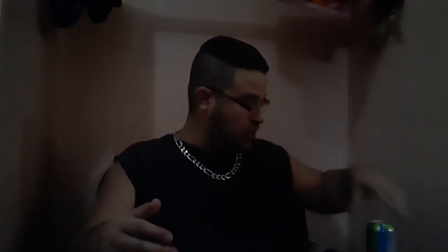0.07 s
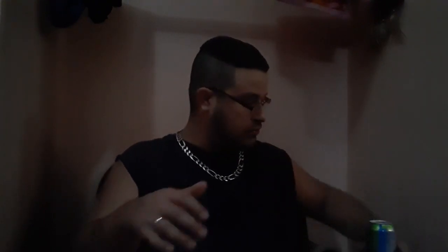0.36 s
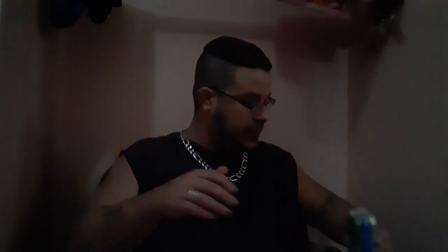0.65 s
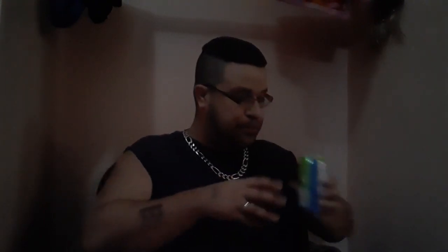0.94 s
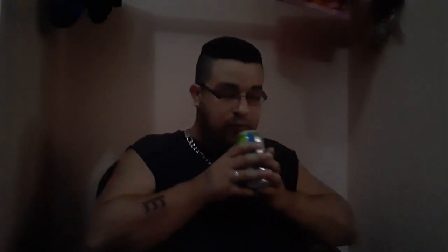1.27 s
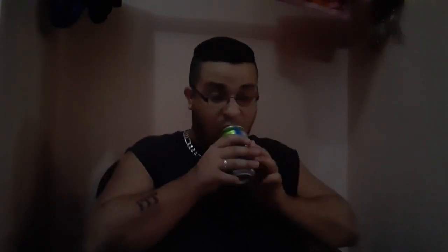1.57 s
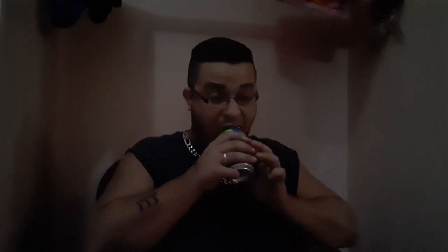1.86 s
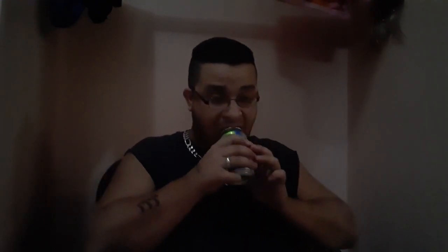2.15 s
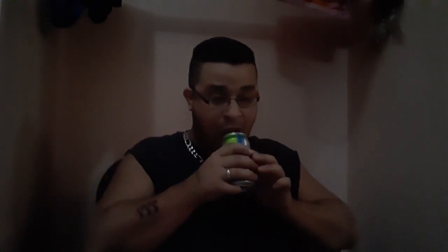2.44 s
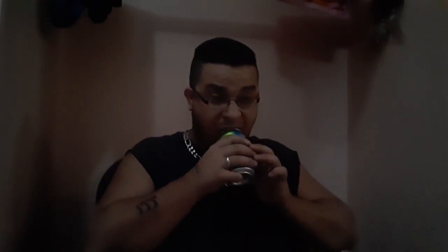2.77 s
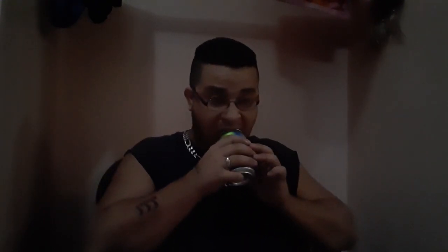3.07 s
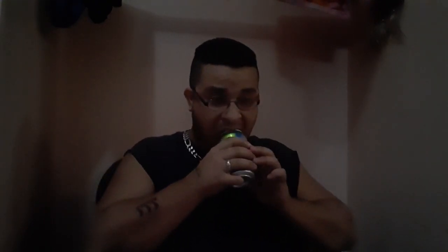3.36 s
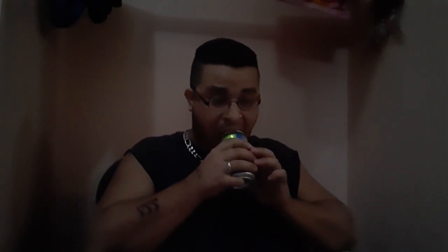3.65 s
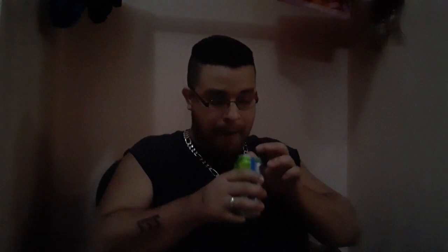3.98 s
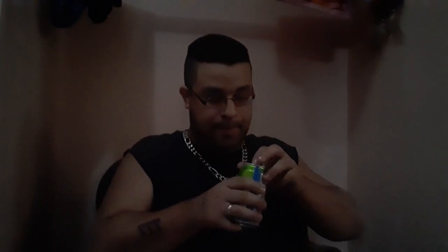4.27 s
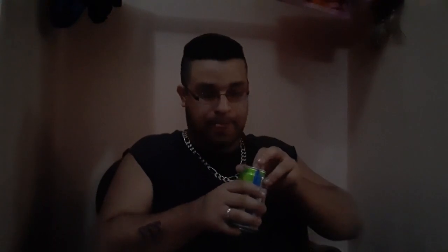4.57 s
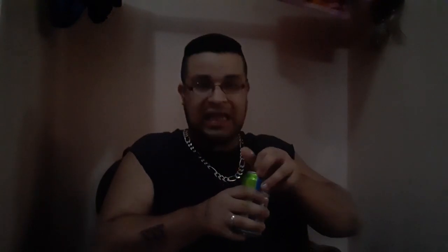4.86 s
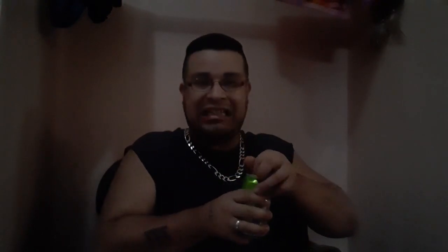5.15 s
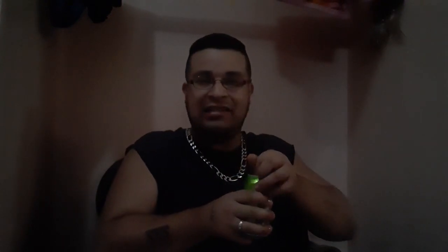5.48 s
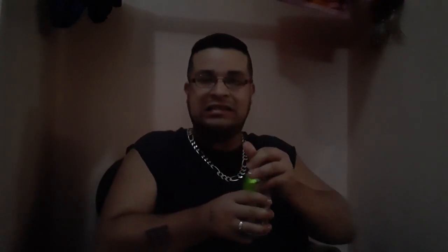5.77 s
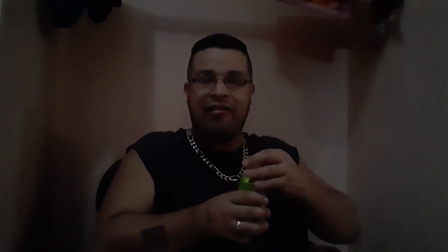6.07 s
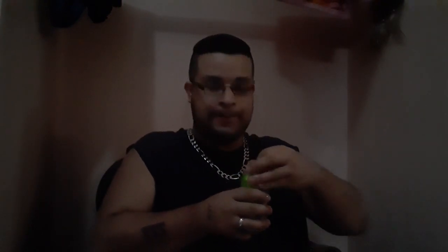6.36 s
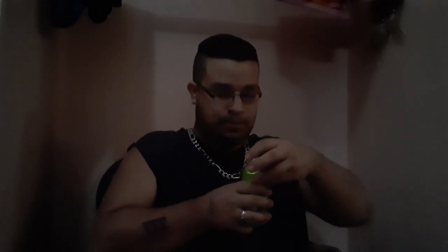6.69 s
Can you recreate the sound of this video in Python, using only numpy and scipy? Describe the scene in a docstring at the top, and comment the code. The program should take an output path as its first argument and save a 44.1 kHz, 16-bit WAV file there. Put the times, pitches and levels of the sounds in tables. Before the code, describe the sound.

A metallic twang from a can tab, followed by the fizzy drink can being opened with sharp cracks and brief spurts of gas.

```python
"""A can of fizzy drink is opened in a small bare room. Teeth pick at the tab, which slips and twangs;
then a finger levers it: the seal cracks, gas spurts out, and the lid tears along its score in two pushes.
Around this come a clack, light knocks, a seat's groan, a squeak of the tab and the rustle of hands.
A fan hums faintly over the room air, and an automatic gain control ducks after each loud snap."""
import sys
import numpy as np
from scipy import signal
from scipy.fft import rfft, irfft
from scipy.io import wavfile
from scipy.ndimage import uniform_filter1d, minimum_filter1d

SR = 44100
rng = np.random.default_rng(int(sys.argv[2]) if len(sys.argv) > 2 else 0)


def to_wav(s):
    """Save 16-bit WAV."""
    ch = np.atleast_2d(s).T  # columns
    pcm = np.round(np.clip(ch, -1, 1) * 32767)  # PCM
    wavfile.write(sys.argv[1], SR, pcm.astype(np.int16))


N = 305256
TIME_S = np.arange(N) / SR

# Room air and hiss. Each row: frequency in Hz, density in dB. All table levels are relative.
AIR_SPECTRUM = [(25, -25), (45, -11.5), (70, -3.5), (200, -1.5), (300, -4.5), (550, -9), (1050, -10),
                (1700, -21), (3500, -28), (5000, -28.5), (7500, -39), (9000, -47.5), (11000, -29),
                (15500, -28)]
# Stereo likeness of the air. Each row: frequency in Hz, left-right correlation before capping.
AIR_CORRELATION = [(60, 0.93), (180, .8), (550, 0.93), (1500, 0.22), (15000, 0.0067)]
# Stereo balance of the air. Each row: frequency in Hz, left minus right in dB.
AIR_PAN = [(60, 10.5), (240, 4.0), (950, 1), (3770, 2.5), (15000, -0.5)]
# Fan hum. Each row: frequency in Hz, level in dB.
FAN_LINES = [(61, -69), (119.5, -62), (214, -63), (293, -72.5), (481, -64.5), (770, -63)]
# Room reverberation. Each row: frequency in Hz, T60 in seconds.
ROOM_DECAY = [(150, 0.068), (1000, 0.38), (3500, 0.37), (7000, 0.38), (11000, 0.33), (16000, 0.2)]
# Hands shifting grip. Each row: middle in seconds, length in seconds, level in dB.
GRIP_SWELLS = [(.44, 0.39, -66), (4.844, 0.17, -67.5), (6.41, 0.21, -68.5), (6.76, 0.24, -67.5)]
# Sliding skin and cloth. Each row: frequency in Hz, density in dB.
RUSTLE_SPECTRUM = [(300, -9), (1400, 1.5), (3800, -3), (7000, -7), (15000, -17.5)]
# The seat groans; later the tab squeaks in the teeth. Each row: start in seconds, length in seconds,
# level in dB, pitch in Hz, glide in Hz per second, waver as a share of pitch.
FRICTION_TONES = [(0.377, 0.091, -47.5, 239, 444, 0.055), (3.562, 0.051, -42, 953.6, 30, 0.0064)]
# Opening clack. Each row: frequency in Hz, density in dB.
CLACK_SPECTRUM = [(300, -35), (1400, -13), (2400, -6), (4600, 3.5), (6500, -4), (9500, -10.5), (12000, -4),
                  (15500, -15)]
# Teeth and fingers on the can. Each row: start in seconds, level in dB, centre in Hz, width in octaves.
KNOCKS = [(0.645, -53.5, 1610, 0.17), (0.8392, -53.5, 9250, 1.1), (1.2973, -54.5, 6760, 1.4),
          (1.3352, -50, 12900, .3), (1.698, -48, 1830, 1.9), (2.336, -34.5, 1670, 2.1),
          (2.8281, -49, 2270, .7), (3.559, -43.5, 1890, 0.28), (4.4204, -52.5, 2140, 0.6),
          (6.133, -55.5, 8100, 2.1), (6.2685, -55, 1270, .25), (6.7127, -56.5, 3900, 1.3)]
# Tab slipping off the teeth.
# Each row: start in seconds, level in dB, tilt in dB per octave, ring over crack in dB.
TAB_SNAPS = [(1.6975, -39.5, 3.5, -19), (1.9245, -44, -3.5, -14), (2.1237, -10, -0.5, 2),
             (2.537, -43.5, 0, -14.5), (2.7503, -47.5, 0.5, -22), (3.5577, -32, -3.5, -1.5)]
# Tab modes. Each row: frequency in Hz, level in dB, T60 in seconds.
TAB_RING = [(1090, -20, 0.02), (1580, -30.5, .05), (3224, -10, 0.022), (3370, 0, 0.054), (3513, -12, 0.056),
            (5454, -2.5, 0.019), (5638, -4, 0.046), (5930, -10, 0.032), (6280, -9.5, 0.023),
            (7530, -7, 0.034), (8860, -7, 0.0083), (12100, -13.5, 0.011)]
# Tab edge letting go. Each row: frequency in Hz, density in dB.
TAB_SPECTRUM = [(30, -25.5), (130, -13), (450, -24), (850, -12), (1900, -23), (2700, -4), (4400, 0.5),
                (6300, -1.5), (9700, -6.5), (12000, -0.5), (15500, -15)]
# Narrow, bright gas jet. Each row: frequency in Hz, density in dB.
SPURT_SPECTRUM = [(30, -19.5), (200, -3), (800, -11.5), (1200, -12), (2000, -4.5), (4500, 0), (7500, -3),
                  (9500, -1), (11700, 4), (15500, -1.5)]
# Low body of that jet. Each row: frequency in Hz, density in dB.
BODY_SPECTRUM = [(60, -19), (220, 0), (1000, -3), (1500, -24.5), (6000, -50)]
# Last gas as the mouth widens. Each row: start in seconds, length in seconds, level in dB.
GUSH_BURSTS = [(5.407, .012, -31), (5.444, 0.028, -14.5)]
# Wide, duller gas jet. Each row: frequency in Hz, density in dB.
GUSH_SPECTRUM = [(200, -30.5), (500, -27), (750, 1), (1400, 0.5), (2200, -1.5), (3100, 8.5), (5800, -2.5),
                 (7500, 1), (9500, -11), (11200, 1), (15000, -6.5)]
# Score tearing: push, creep, push. Each row: start in seconds, length in seconds, level in dB.
TEAR_BURSTS = [(5.076, 0.063, -20.5), (5.16, 0.053, -41.5), (5.46, 0.033, -24.5)]
# Lid buckling. Each row: start in seconds, level in dB, tilt in dB per octave, ring over crack in dB.
LID_SNAPS = [(5.0205, -13.5, 3.5, -5.5), (5.0667, -4.5, -2, 6.5), (5.0785, -3, 1.5, 15),
             (5.2943, -17.5, 1.5, -4.5), (5.3124, -18, 3.5, 0), (5.318, -21, -1.5, 7.5),
             (5.4155, -21, 0.5, 0), (5.423, -9.5, 4, 4), (5.456, -5, 0.5, 4.5)]
# Lid modes, damped by drink and hand. Each row: frequency in Hz, level in dB, T60 in seconds.
LID_RING = [(1800, -8.5, 0.0072), (2114, -8, 0.016), (3804, -10, 0.015), (4450, -4, 0.0067),
            (4826, -5, 0.016), (5650, -6, .009), (6560, -9, .007), (8500, -16.5, .008), (11000, -18, .005)]
# Lid giving way. Each row: frequency in Hz, density in dB.
LID_SPECTRUM = [(30, -30.5), (130, -18.5), (400, -28.5), (900, -15.5), (1400, -6.5), (2500, -1.5),
                (4200, -3.5), (6500, 4.5), (9500, -5.5), (12000, -0.5), (15500, -13.5)]


def from_db(db):
    """Decibels to gain."""
    return 10 ** (np.asarray(db) / 20)


def unit_rms(x):
    """Scale to rms 1."""
    return x / np.sqrt(np.mean(x ** 2) + 1e-20)


def unit_attack(x):
    """Scale the first 3 ms to rms 1."""
    return x / np.sqrt(np.mean(x[:132] ** 2) + 1e-20)


def at_hz(points, hz):
    """Interpolate a table over log frequency."""
    known_hz, values = np.transpose(points)
    return np.interp(np.log(hz + 1e-9), np.log(known_hz), values)


def bins_hz(size):
    """FFT bin frequencies."""
    return np.fft.rfftfreq(size, 1 / SR)


def noise(gain):
    """Noise of rms 1, shaped by a gain per bin."""
    return unit_rms(irfft(gain * np.exp(2j * np.pi * rng.random(len(gain)))))


def drift(rate_hz):
    """Low-passed random wander of rms 1."""
    return noise(1 / (1 + (bins_hz(N) / rate_hz) ** 2))


def rushing(spectrum, sputter_db):
    """Turbulent or sliding noise that sputters in level."""
    return noise(from_db(at_hz(spectrum, bins_hz(N)))) * from_db(sputter_db * drift(300))


def pan(db):
    """Channel gains for a left-minus-right level."""
    return from_db(np.array([[.5], [-.5]]) * db)


def add(track, start_s, sound):
    """Mix a sound in place."""
    start = min(round(start_s * SR), N)
    track[start:start + len(sound)] += sound[:N - start]


def decay(t60_s, size=4096):
    """Exponential decay."""
    return from_db(-60 * TIME_S[:size] / t60_s)


def burst(start_s, length_s, db, attack_s, release_db_per_s):
    """Rise, hold and release envelope."""
    age_s = TIME_S - start_s
    fall_db = np.clip(release_db_per_s * (age_s - length_s), 0, 200)
    return np.clip(age_s / attack_s, 0, 1) * from_db(db - fall_db)


def room_air():
    """Steady noise, alike in both channels in the bass."""
    hz = bins_hz(N)
    alike = np.clip(at_hz(AIR_CORRELATION, hz), 0, .85)
    mid, side = rfft(rng.standard_normal((2, N)))
    stereo = np.sqrt(1 + alike) * mid + np.sqrt(1 - alike) * side * [[1], [-1]]
    return unit_rms(irfft(from_db(at_hz(AIR_SPECTRUM, hz)) * pan(at_hz(AIR_PAN, hz)) * stereo))


def fan(waver_hz=1.45):
    """Hum lines, each wavering in pitch."""
    return sum(from_db(db) * np.sqrt(2) * np.sin(2 * np.pi * np.cumsum(hz + waver_hz * drift(5)) / SR)
               for hz, db in FAN_LINES)


def background(lag_samples=14):
    """Air and fan; both reach the left channel later."""
    left, right = from_db(-54.56) * room_air() + from_db(-2.5) * pan(3) * fan()
    return np.array([np.interp(TIME_S - lag_samples / SR, TIME_S, left), right])


def room(x, wet_db=4.5, build_s=.0041, reflection_s=.0011, reflection_db=-5, size=32768):
    """Direct sound, one near reflection and a dense tail that differs per channel."""
    hz = bins_hz(size)
    white = np.exp(2j * np.pi * rng.random((2, len(hz))))
    tail = 0
    for band_hz, t60_s in ROOM_DECAY:
        band = at_hz([(row[0], row[0] == band_hz) for row in ROOM_DECAY], hz)
        tail += irfft(white * band) * decay(t60_s, size)
    tail *= 1 - np.exp(-(TIME_S[:size] / build_s) ** 2)
    response = from_db(wet_db) * pan(1.5) * tail / np.linalg.norm(tail, axis=1, keepdims=True)
    response[:, :1] += pan(6.5)   # direct path
    for channel in response:
        channel[round(reflection_s * SR * rng.uniform(.8, 1.2))] += from_db(reflection_db)
    return signal.fftconvolve(x[None], response, axes=1)[:, :N]


def grip_rustle():
    """Skin and cloth slide in bell-shaped swells."""
    swells = sum(from_db(db) * np.exp(-np.minimum(2 * ((TIME_S - middle_s) / length_s) ** 2, 20))
                 for middle_s, length_s, db in GRIP_SWELLS)
    return swells * rushing(RUSTLE_SPECTRUM, sputter_db=1.5)


def friction_tone(start_s, length_s, db, start_hz, glide_hz_per_s, waver):
    """Stick and slip drives one resonance, gliding and unsteady in pitch."""
    glide_hz = start_hz + glide_hz_per_s * np.clip(TIME_S - start_s, 0, length_s)
    hz = glide_hz * (1 + waver * drift(70))
    tone = unit_rms(np.sin(2 * np.pi * np.cumsum(hz) / SR))
    return tone * burst(start_s, length_s, db, attack_s=.005, release_db_per_s=1300)


def clack(peak_s=.0562, growth_db_per_s=900, t60_s=.017):
    """A brief noise swell rises into a sharp clack, then stops dead."""
    age_s = TIME_S - peak_s
    db = np.where(age_s < 0, -41 + growth_db_per_s * age_s, -22.5 - 60 * age_s / t60_s)
    return from_db(np.maximum(db, -200)) * noise(from_db(at_hz(CLACK_SPECTRUM, bins_hz(N))))


def faint_touches(count=24, per_s=2.2, low_hz=1400, high_hz=9000):
    """Random finger contacts, as rows like KNOCKS."""
    wait, strength, pitch = rng.random((count, 3)).T
    starts_s = np.cumsum(2 * wait / per_s)
    centres_hz = low_hz * (high_hz / low_hz) ** pitch
    return list(zip(starts_s, -64 + 3 * strength, centres_hz, np.ones(count)))


def handling(t60_s=.012):
    """Light contacts on the can: band-limited bursts, damped at once by the hand."""
    out = np.zeros(N)
    for start_s, db, centre_hz, octaves in KNOCKS + faint_touches():
        band = 1 / (1 + (np.log2((bins_hz(4096) + 1) / centre_hz) / octaves) ** 2) ** 2
        add(out, start_s, from_db(db) * unit_attack(noise(band) * decay(t60_s)))
    return out


def metal_ring(modes, tilt_db_per_oct, scatter_db, detune):
    """One blow on a set of modes; the metal bends, so levels and pitches vary each time."""
    out = 0
    for k, (hz, db, t60_s) in enumerate(modes):
        gain = from_db(db + tilt_db_per_oct * np.log2(hz) - scatter_db * rng.normal())
        bent_hz = hz * (1 + detune * rng.normal())
        out += (-1) ** k * gain * np.sin(2 * np.pi * bent_hz * TIME_S[:4096]) * decay(t60_s)
    return unit_attack(out)


def snaps(events, modes, spectrum, crack_t60_s, scatter_db, detune):
    """Thin metal jumps: a brief broad crack plus the ring of the part that moved."""
    out, hz = np.zeros(N), bins_hz(4096)
    for start_s, db, tilt_db_per_oct, ring_db in events:
        colour = from_db(at_hz(spectrum, hz) + tilt_db_per_oct * np.log2(hz + 100))
        crack = unit_attack(noise(colour) * decay(crack_t60_s))
        ring = from_db(ring_db) * metal_ring(modes, tilt_db_per_oct, scatter_db, detune)
        add(out, start_s, from_db(db) * unit_attack(crack + ring))
    return out


def tab_twangs(bounce_count=4, first_gap_s=.0208, gap_ratio=.75):
    """The tab slips and springs back; after the hardest slip it bounces on the lid ever faster."""
    hardest_s = max(TAB_SNAPS, key=lambda row: row[1])[0]
    bounces_s = hardest_s + np.cumsum(first_gap_s * gap_ratio ** np.arange(bounce_count))
    events = TAB_SNAPS + [(start_s, -15, 1, 4) for start_s in bounces_s]
    return snaps(events, TAB_RING, TAB_SPECTRUM, crack_t60_s=.037, scatter_db=5.5, detune=.0068)


def escaping_gas(start_s=5.022, length_s=.035, widening_s=.016):
    """A bright spurt fills out as the slit widens; duller gushes follow through the open mouth."""
    spurt = burst(start_s, length_s, db=-16, attack_s=.0095, release_db_per_s=900)
    body = burst(start_s, length_s, db=-33, attack_s=widening_s, release_db_per_s=900)
    gush = sum(burst(*row, attack_s=.0055, release_db_per_s=428) for row in GUSH_BURSTS)
    return (spurt * rushing(SPURT_SPECTRUM, sputter_db=2)
            + body * rushing(BODY_SPECTRUM, sputter_db=.8)
            + gush * rushing(GUSH_SPECTRUM, sputter_db=.5))


def score_tearing(slips_per_s=700, spread_db=8.5, places=12):
    """The score yields in a run of tiny slips; each place along it rings the lid differently."""
    slipping = rng.random(N) < slips_per_s / SR
    slips = slipping * from_db(spread_db * rng.uniform(-.89, 1, N)) * rng.choice([-1, 1], N)
    place = rng.integers(0, places, N)
    rings = 0
    for k in range(places):
        ring = metal_ring(LID_RING, tilt_db_per_oct=4, scatter_db=1, detune=.04)
        rings += signal.oaconvolve(slips * (place == k), ring)[:N]
    return unit_rms(rings) * sum(burst(*row, attack_s=.012, release_db_per_s=753) for row in TEAR_BURSTS)


def lid_cracks():
    """The levered lid buckles, cracks and rings briefly."""
    return snaps(LID_SNAPS, LID_RING, LID_SPECTRUM, crack_t60_s=.012, scatter_db=1, detune=.031)


def scene():
    """Can and handling sound through the room, over the background."""
    tab = from_db(-3.5) * tab_twangs()
    lid = from_db(-4.5) * (lid_cracks() + score_tearing())
    friction = from_db(-5.5) * (sum(friction_tone(*row) for row in FRICTION_TONES) + grip_rustle())
    contacts = from_db(-4.5) * (clack() + handling())
    gas = from_db(-5.5) * escaping_gas()
    return room(tab + lid + friction + contacts + gas) + background()


def gain_control(x, threshold_db=-30.5, depth_db=6, hold_s=1.11, release_db_per_s=9, attack_s=.037):
    """A loud sound turns the gain down; it holds, then creeps back."""
    power = uniform_filter1d(np.mean(x ** 2, axis=0), size=220)
    cut_db = np.clip(10 * np.log10(np.abs(power) + 1e-12) - threshold_db, 0, depth_db)
    half_hold = int(hold_s * SR / 2)
    held_db = -minimum_filter1d(-cut_db, 2 * half_hold + 1, origin=half_hold, mode="constant")
    ramp_db = release_db_per_s * TIME_S
    released_db = np.maximum.accumulate(held_db + ramp_db) - ramp_db
    pole = np.exp(-1 / (attack_s * SR))
    return x * from_db(-signal.lfilter([1 - pole], [1, -pole], released_db))


def record(dry):
    """Gain control, rounded peaks, then a steep low-pass."""
    cutoff_hz = 15800
    lowpass = signal.ellip(10, .2, 80, cutoff_hz, fs=SR, output="sos")
    return signal.sosfilt(lowpass, np.tanh(gain_control(dry)))


dry = scene()
out = record(dry)
to_wav(out)
```